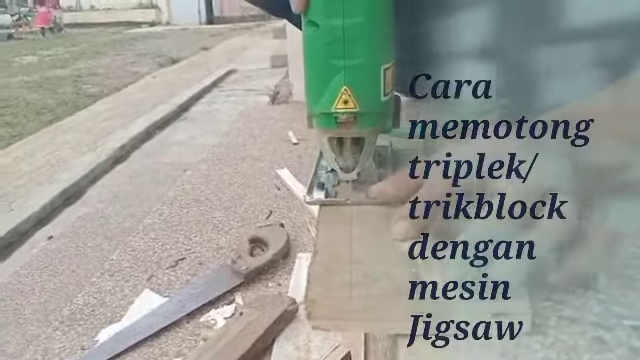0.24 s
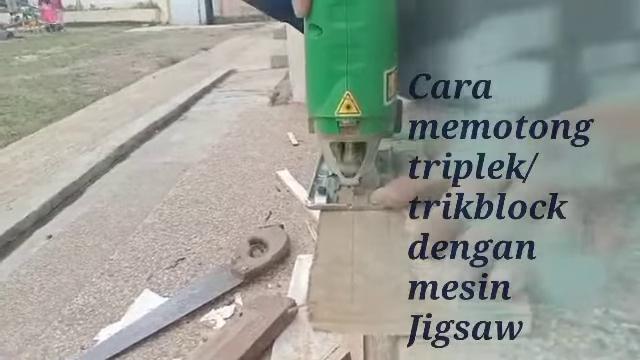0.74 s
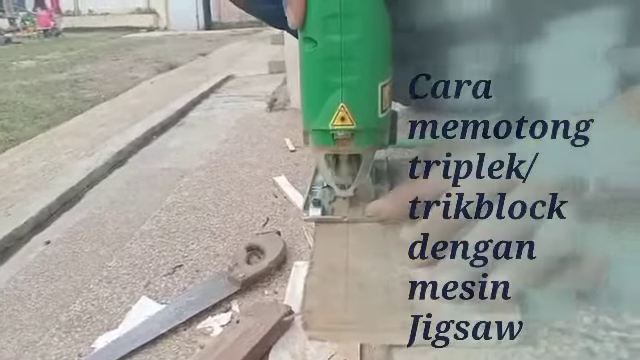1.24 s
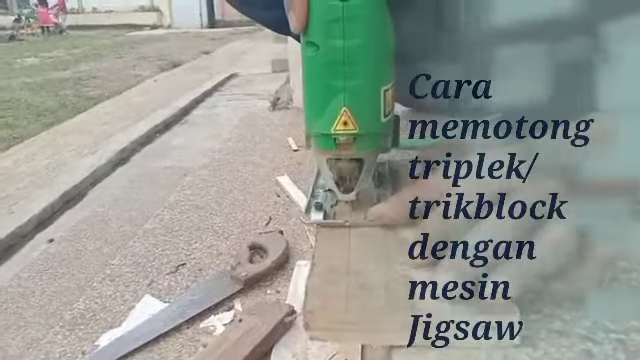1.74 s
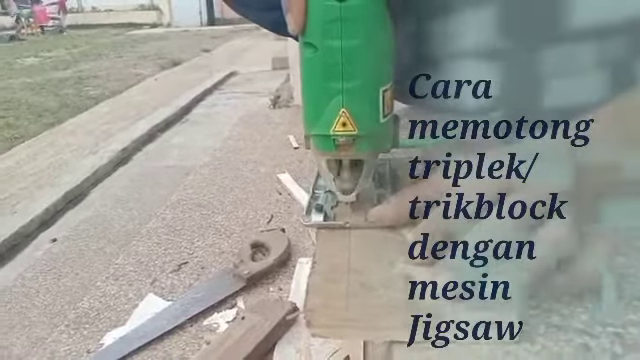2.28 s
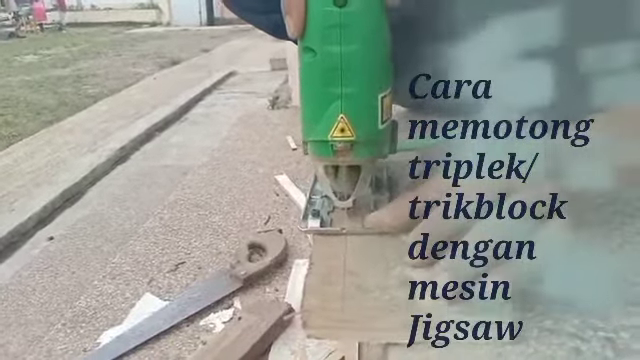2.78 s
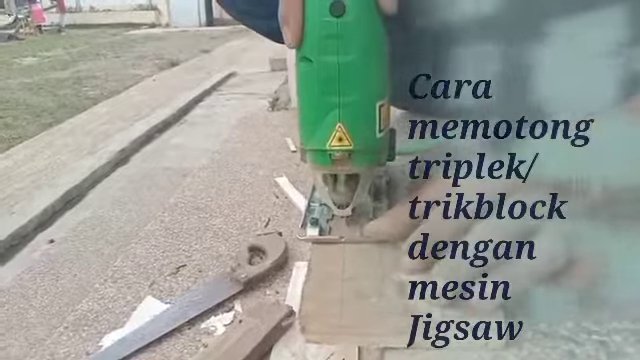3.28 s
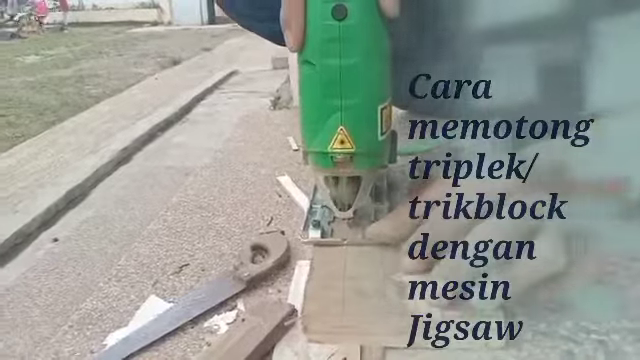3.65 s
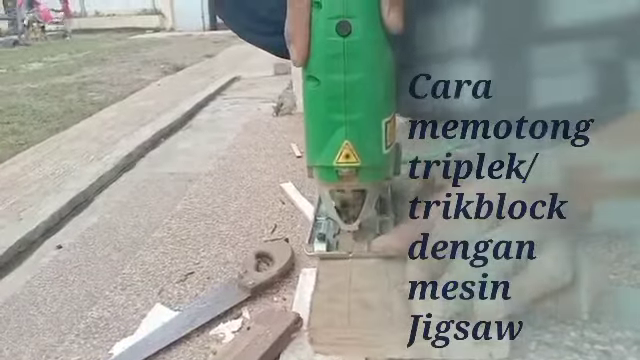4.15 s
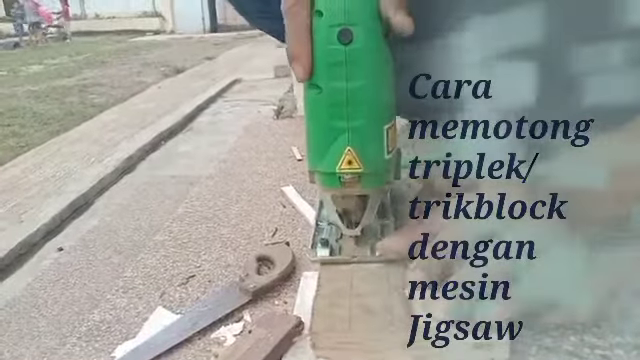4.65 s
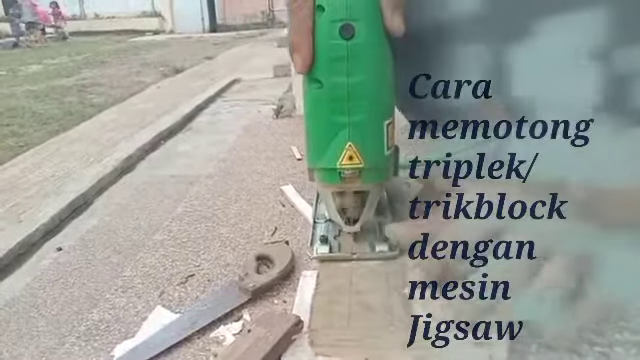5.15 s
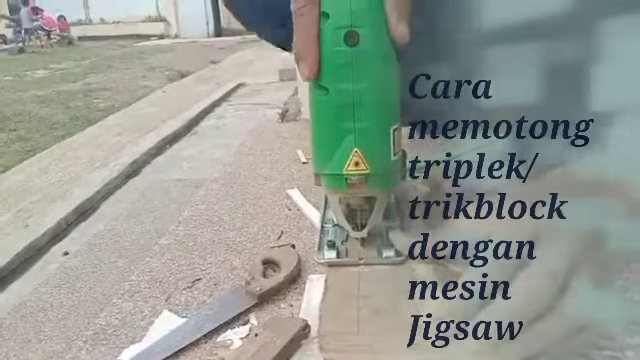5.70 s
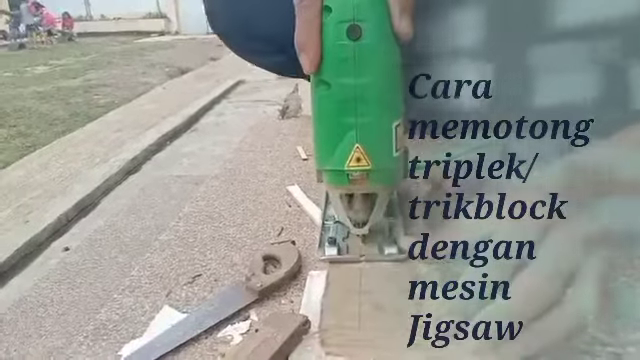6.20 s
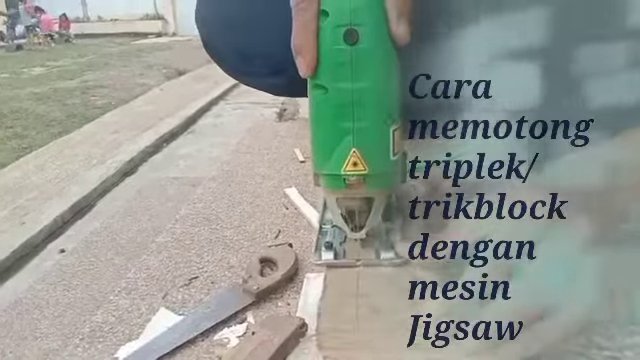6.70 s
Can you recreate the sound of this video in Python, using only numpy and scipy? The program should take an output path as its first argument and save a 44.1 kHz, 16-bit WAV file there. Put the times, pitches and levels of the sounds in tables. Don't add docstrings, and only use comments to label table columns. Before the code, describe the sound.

Harsh, rattling electric jigsaw cutting a wooden sheet outdoors; midway the motor winds down, the blade clatters, and the full buzz abruptly returns.

```python
import sys
import numpy as np
from scipy import signal
from scipy.fft import rfft, irfft, next_fast_len
from scipy.io import wavfile
from scipy.ndimage import uniform_filter1d, map_coordinates

SR = 44100
rng = np.random.default_rng(int(sys.argv[2]) if len(sys.argv) > 2 else 0)


def ratio(d):
    e = np.asarray(d, float) / 20
    return 10 ** e


def to_wav(sig):
    pcm = np.clip(np.atleast_2d(sig), -1, 1) * 32767
    pcm = np.round(pcm).astype(np.int16)
    wavfile.write(sys.argv[1], SR, pcm.T)


N = 305613

# time in seconds, effort in dB, vents turned towards the listener in dB.
MOTOR_EFFORT = [(0.0, -21, 2.5), (1.68, -21, -1.5), (4.32, -23, -3), (4.67, -26.5, 0.5), (4.75, -24.5, -3),
                (4.98, -26.5, 0.5), (5.02, -23, -1.5), (5.21, -24.5, -0.5), (5.38, -24, -1.5),
                (5.48, -22.5, 0), (5.62, -23, 3), (5.69, -17, -3), (6.41, -20.5, -2), (6.93, -20.5, -2.5)]
# frequency in Hz, level in dB per Hz.
CASING = [(1120, -13), (1900, -18.5), (2130, -15.5), (2720, -7.5), (3290, -4.5), (4240, -12), (4710, -6),
          (5710, -4), (6230, -7.5), (6970, -7.5), (9140, -22.5), (11400, -22.5), (14300, -15), (15300, -14)]
# time in seconds, peak in dB.
SNAGS = [(5.318, -17), (5.4121, -17), (5.468, 2), (5.4945, -10), (5.526, 1), (5.5883, -0.5), (5.655, -4),
         (5.700, -21), (5.732, -15), (5.754, -16), (5.8023, -2), (5.832, -14), (5.861, -22), (5.876, -21),
         (5.890, -23)]
BITE_AT, RETURN_AT = .36, .8
RELEASE_S, SQUEEZE_S = 4.44, 5.621
JOLT_DB = 2.5


def unit(x):
    return x / np.sqrt(np.mean(x ** 2) + 1e-20)


def along(points, hz):
    f, v = np.transpose(points)
    return np.interp(np.log(hz + 1), np.log(f + 1), v)


def curves(rows):
    s, *cols = np.transpose(rows)
    return [np.interp(np.arange(N) / SR, s, c) for c in cols]


def wobble(rate):
    knots = rng.standard_normal(int(N * rate / SR) + 9)
    return map_coordinates(knots, [np.arange(N) * rate / SR])


def filtered(x, response):
    m = next_fast_len(N + SR // 2)
    return irfft(rfft(x, m) * response(np.fft.rfftfreq(m, 1 / SR)), m)[:N]


def band(lo_hz, hi_hz, order=6):
    return lambda hz: 1 / np.sqrt((1 + (lo_hz / (hz + 1)) ** order) * (1 + (hz / hi_hz) ** order))


def noise(spectrum, beat, shape=np.ones_like):
    return unit(filtered(beat * rng.standard_normal(N), lambda hz: ratio(along(spectrum, hz)) * shape(hz)))


def hump(turn, centre, width, tail=1):
    off = (turn - centre + .5) % 1 - .5
    return np.exp(-.5 * (off / np.where(off > 0, width * tail, width)) ** 2)


def trigger():
    # time in seconds, strokes per second.
    powered_speed = [(0.0, 41.595), (0.25, 41.492), (0.6, 41.554), (1.1, 41.328), (1.9, 41.404),
                     (2.37, 41.846), (2.7, 41.341), (3.7, 41.371), (4.0, 41.666), (4.35, 42.5),
                     (6.1, 41.698), (6.93, 41.86)]
    drag_s, friction, spin_up_s = 1.562, 9.045, .176
    slack_s = .06
    t = np.arange(N) / SR
    powered = curves(powered_speed)[0]

    def coast(s):
        return (np.interp(RELEASE_S, t, powered) + friction) * np.exp(-(s - RELEASE_S) / drag_s) - friction

    inrush = (t >= SQUEEZE_S) * np.exp(-np.abs(t - SQUEEZE_S) / spin_up_s)
    off = (t >= RELEASE_S) & (t < SQUEEZE_S)
    speed = np.where(off, coast(t), powered - (powered - coast(SQUEEZE_S)) * inrush)
    return speed, uniform_filter1d(1. * off, round(slack_s * SR) + 1), inrush


def grip():
    speed, coasting, _ = trigger()
    return 3.4 * 20 * np.log10(speed / speed[0]) - 9.5 * coasting


def jolts():
    t, decay_s = np.arange(N) / SR, 0.017
    return sum(ratio(db + 2.5) * (t > s) * np.exp(-np.abs(t - s) / decay_s) for s, db in SNAGS)


def bite(turn, speed, chips):
    # time in seconds, bite in dB, bite ring in Hz,
    # return stroke against up-stroke in dB.
    feed = [(0, -23, 1400, -5), (.36, -19.5, 1370, -7), (1.25, -25, 1427, -18), (2.03, -28, 1440, -1.5),
            (2.2, -21, 1390, -8), (2.47, -25.5, 1470, -8), (2.55, -22.5, 1440, -5),
            (3.45, -18.5, 1420, -24), (3.85, -17, 1380, -10), (4.33, -20, 1440, -2.5),
            (4.55, -42, 1520, -0.5), (5.4, -23, 1490, 7), (5.72, -23.5, 1520, -16), (5.86, -20.5, 1645, 6),
            (5.965, -23.5, 1580, 5.5), (6.0, -16, 1450, -14), (6.54, -21.5, 1466, 2), (6.93, -17, 1420, -3)]
    clean_bite = 0.28
    level_db, ring_hz, back_db = curves(feed)
    level_db = level_db + 1.1 * JOLT_DB * jolts()
    load_db = grip() + clean_bite * (level_db + 23.5)
    ring_hz = uniform_filter1d(ring_hz, size=4000)
    ringing = np.zeros(N)
    for centre, width, gain in [(BITE_AT, .055, 1), (RETURN_AT, .05, ratio(back_db))]:
        stroke = np.floor(turn - centre + .5).astype(int) + 1
        luck = rng.standard_normal((stroke[-1] + 1, 3))[stroke]
        since = ((turn - centre + .5) % 1 - .5) / speed
        phase = 2 * np.pi * ring_hz * (1 + .011 * luck[:, 0]) * since + .3 * luck[:, 1] + wobble(2)
        size = ratio(0.67 * luck[:, 2] + 1.9 * wobble(5.3))
        burst = hump(turn + 0.042 + 0.031 * wobble(9), centre, width, tail=1.85)
        ringing += gain * size * burst * np.sin(phase)
    ringing = unit(filtered(ringing, band(500, 30000)))
    beat = chips * (1.4 + hump(turn, BITE_AT, 0.16))
    rub = noise([(900, -32.5), (1200, -15.0), (1430, 1.0), (1750, 1.5), (2000, -19), (2300, -27.5)], beat)
    return ratio(level_db) * (0.89 * ratio(load_db) * ringing + 0.38 * rub)


def sheet(turn):
    # multiple of the stroke rate, level in dB.
    harmonics = [(1, -46), (2, -37), (3, -31), (4, -24.5), (5, -22), (6, -20.5), (7, -6.5), (8, -10),
                 (9, -3), (10, -8.5), (11, -2.5), (12, -14), (13, -24.5), (14, -9.5), (15, -10), (16, -8.5),
                 (17, 3.5), (18, -11), (19, -5), (20, -26.5), (21, -5), (22, -13), (23, -31), (24, -48),
                 (25, -10), (26, 3.5), (27, -1), (28, 0), (29, -28), (30, -3)]
    sag_s, sag_takes_s, sag_db = 3.9, .15, {16: 9.1, 17: -8}
    bench_s, bench_long_s, bench_db, bench_order = 3.64, 0.36, -50.5, 4.4
    unsettled_db = -14
    t = np.arange(N) / SR
    low_db = -35.5 - 0.88 * np.abs(t - 3.14)
    high_db = -27.5 - 1.37 * t
    sagged = np.clip((t - sag_s) / sag_takes_s, 0, 1)

    def line(k, db):
        level = ratio(db + sag_db.get(k, 0) * sagged + 2.4 * wobble(3.59))
        return level * np.sin(2 * np.pi * (k * turn + rng.random()) + 0.5 * wobble(5.5))

    low = unit(sum(line(k, db) for k, db in harmonics[3:13]))
    high = unit(sum(line(k, db) for k, db in harmonics[13:]))
    hum = ratio(low_db - 1.5) * low + ratio(high_db - 2.0) * high
    bench_swell = np.exp(-(2 * (t - bench_s) / bench_long_s - 1) ** 4)
    bench = ratio(bench_db) * bench_swell * np.sin(2 * np.pi * bench_order * turn)
    return ratio(grip() + unsettled_db * trigger()[2]) * hum + bench


def motor(turn, chips):
    # frequency in Hz, level in dB per Hz.
    dust_colour = [(110, -60), (180, -16), (467, -9.5), (544, -10.5), (721, -7.5), (915, -1), (1210, 1),
                   (1320, 0.5), (1520, 3), (2400, -16), (3120, -50), (5280, -120)]
    # dB, growth with effort, share of the turn, change while coasting in dB.
    parts = [(-25.5, 1.06, -.5, 1.5),
             (-22.5, 1.16, .5, 0),
             (-30, 0.48, -.5, -3),
             (-34, 1.49, .3, 3.5)]
    effort_db, facing_db = curves(MOTOR_EFFORT)
    effort_db = effort_db + 21 + JOLT_DB * jolts()
    coasting = trigger()[1]
    rattle_db, scream_db, fan_db, dust_db = [
        db + grows * effort_db + share * facing_db + idle_db * coasting for db, grows, share, idle_db in parts]
    stroke = 1 - 0.85 * hump(turn, 0.99, 0.019)
    stroke += 0.088 * hump(turn, 0.41, 0.079) + 0.28 * hump(turn, RETURN_AT, 0.049)
    rattle = noise(CASING, stroke * chips * ratio(0.65 * wobble(150)), band(1360, 4330))
    scream = noise(CASING, stroke * chips ** 0.1 * ratio(1.82 * wobble(230)), band(4860, 6100))
    fan = noise(CASING, stroke ** 0.25 * chips ** 0.17 * ratio(2.4 * wobble(350)), band(10300, 10300))
    air = noise(CASING, stroke ** .7 * chips ** .25 * ratio(1.6 * wobble(350)), band(13400, 30000))
    dust = noise(dust_colour, stroke * chips, band(690, 9000))
    dust += ratio(0.14 * grip() - 9.0) * noise(dust_colour, stroke * chips, band(275, 633))
    casing = ratio(rattle_db) * rattle + ratio(scream_db - 1.5) * scream
    return casing + ratio(fan_db - 1.5) * fan + ratio(fan_db - 1.0) * air + ratio(dust_db + 5.0) * dust


def whine(turn):
    # level in dB, phase blur in radians.
    tones = [
        [(-6, .8), (-6, .8), (-6, .8), (-6, .8)],
        [(1, 1.1), (-16, 1.2), (-8, 1.2), (-7, 1.2), (-4, 1.2), (-5, 1.2)],
        [(-35, .7), (-32, 2.3), (-33, 2.3), (-44, .7), (-45, .5)],
    ]
    mesh_orders, driven_orders = [44, 45, 46, 47], [92, 136, 138, 230, 331.2]
    commutator_orders = [220.8, 331.2, 441.6, 552, 662.4, 772.8]
    # dB under power, dB while coasting, growth with effort, dB added by the starting current.
    mesh_level, commutator_level, driven_level = (-39, -36, 1, 3), (-46, -28, 1.2, 15), (0, -25, 0, -8)
    ripple = .0014
    emerge_s, sink_s = .55, .22
    strain_db, strain_order, strain_blur = -23, 92, 1.6
    loose_mesh_db = -7
    dulling_db_per_s = -1.3
    t = np.arange(N) / SR
    uneven = turn + ripple * (1 + 0.2 * wobble(25)) * np.sin(2 * np.pi * turn)

    def family(orders, rows, angle):
        return sum(ratio(db + 2.24 * wobble(13)) * np.sin(2 * np.pi * k * angle + blur * wobble(110))
                   for k, (db, blur) in zip(orders, rows))

    mesh = family(mesh_orders, tones[0], uneven)
    commutator = family(commutator_orders, tones[1], uneven)
    driven = family(driven_orders, tones[2], turn)
    _, coasting, inrush = trigger()
    gaining = 4 * np.abs(inrush * (1 - inrush))
    free = coasting * np.clip((t - RELEASE_S) / emerge_s, 0, 1)
    sinking = free * np.clip((SQUEEZE_S - t) / sink_s, 0, 1)
    effort_db = curves(MOTOR_EFFORT)[0] + 21

    def level(settings, share, surge):
        on_db, off_db, grows, start_db = settings
        return on_db + (off_db - on_db) * share + grows * effort_db + start_db * surge

    mesh_db = level(mesh_level, sinking, gaining) + loose_mesh_db * coasting * (1 - sinking)
    commutator_db = level(commutator_level, free, gaining)
    driven_db = level(driven_level, coasting, np.sqrt(np.abs(inrush)))
    driven_db = driven_db + dulling_db_per_s * t * (np.arange(N) < RELEASE_S * SR + SR // 2)
    throb = 1 + 0.19 * np.cos(2 * np.pi * (turn - RETURN_AT))
    high = ratio(commutator_db + 2) * throb * commutator + ratio(driven_db + 3) * driven
    strain = ratio(strain_db + 3 * wobble(20)) * gaining ** .6 * (1 - inrush)
    high += strain * np.sin(2 * np.pi * strain_order * turn + strain_blur * wobble(110))
    coloured = filtered(high, lambda hz: ratio(.8 * along(CASING, np.clip(hz, 2600, 15000)) + 3))
    return ratio(mesh_db + 6) * throb * mesh + coloured


def snags():
    # centre in Hz, width in Hz, level in dB.
    modes = [(1300, 700, 0), (3250, 1200, 0), (5600, 1800, -1), (13500, 4000, -15)]
    # frequency in Hz, gain in dB.
    dip = [(7000, -2), (10000, -11), (13000, -4)]
    blows, t = np.zeros(N + SR), np.arange(SR // 40) / SR
    for s, db in SNAGS:
        blows[round(s * SR):][:len(t)] += ratio(db - 60 * t / 0.0098) * rng.standard_normal(len(t))

    def ring(f):
        return sum((-1) ** k * ratio(db) * 1j * f * w / (c * c - f * f + 1j * f * w)
                   for k, (c, w, db) in enumerate(modes))

    return ratio(-2) * filtered(blows[:N], lambda f: ring(f) * ratio(along(dip, f)))


def ground():
    # frequency in Hz, level in dB per Hz.
    rumble = [(15, -54), (25, -36), (81, -19), (150, 2.5), (220, -6.5), (260, 1.5), (340, 9), (570, -120)]
    # start in seconds, length in seconds, bench shake in dB, wind in dB.
    bumps = [(0.07, 0.041, -47, -69), (2.462, 0.042, -50.5, -71), (2.596, 0.034, -49, -79),
             (2.84, 0.072, -54, -67), (2.984, 0.21, -54.5, -72), (3.708, 0.162, -55, -79),
             (3.965, 0.03, -52, -74), (4.21, 0.032, -52, -72), (5.423, 0.076, -40.5, -66),
             (5.567, 0.26, -42, -53), (6.298, 0.114, -53, -73)]
    calm_shake_db, calm_wind_db, edge_s = -64, -76, 0.027
    t = np.arange(N) / SR

    def lump(s, long):
        outside = np.clip(np.abs(t - s - long / 2) - long / 2, 0, 9)
        return np.exp(-(outside / edge_s) ** 2)

    shaking = ratio(calm_shake_db + 2.7 * wobble(3.07))
    shaking += sum(ratio(db - 1.5) * lump(s, long) for s, long, db, _ in bumps)
    puffs = ratio(calm_wind_db + 7.4 * wobble(2.98))
    puffs += sum(ratio(db) * lump(s, long) for s, long, _, db in bumps)
    shake = noise(rumble, ratio(4.6 * wobble(13)), band(96, 186))
    wind = noise(rumble, ratio(7 * wobble(11)), band(45, 94))
    return shaking * shake + puffs * wind


def scene():
    speed = trigger()[0]
    turn = np.cumsum(speed) / SR
    chips = ratio(0.53 * wobble(260) + 0.44 * wobble(45) + 0.36 * wobble(9))
    saw = bite(turn, speed, chips) + sheet(turn) + motor(turn, chips) + whine(turn)
    return (saw + snags() + ground())[None]


def top_cut(x):
    return signal.sosfilt(signal.butter(12, 16830, fs=SR, output="sos"), x)


def record(dry):
    top_hz = 15510
    mix = filtered(dry[0], lambda hz: hz < top_hz)[None]
    return top_cut(mix)


dry = scene()
out = record(dry)
to_wav(out)
```